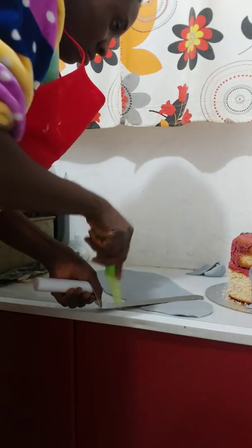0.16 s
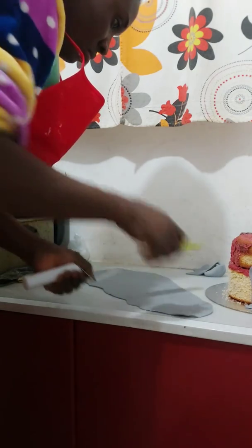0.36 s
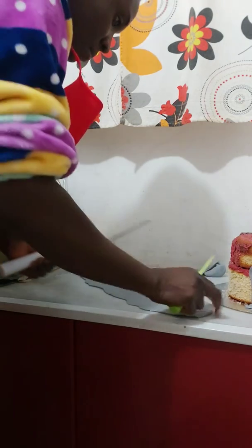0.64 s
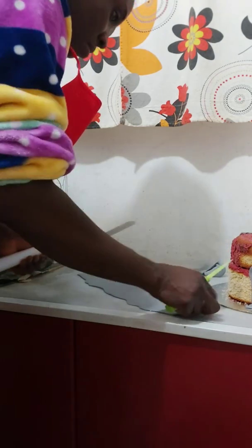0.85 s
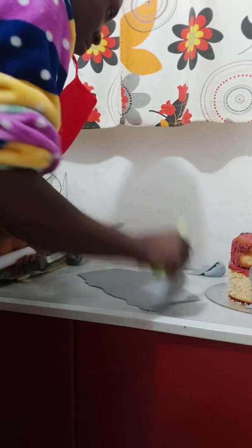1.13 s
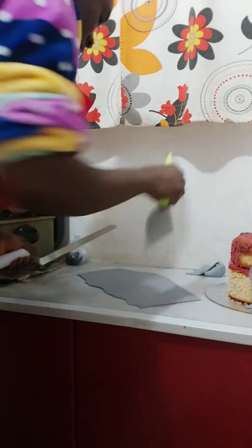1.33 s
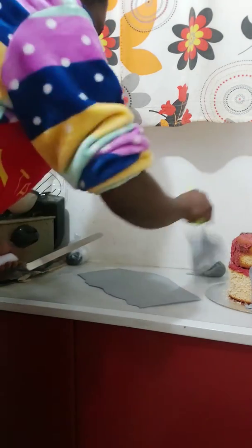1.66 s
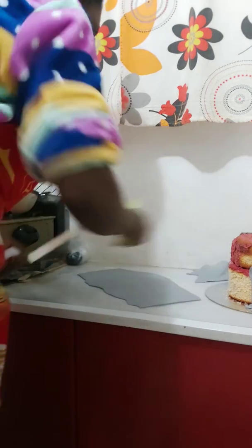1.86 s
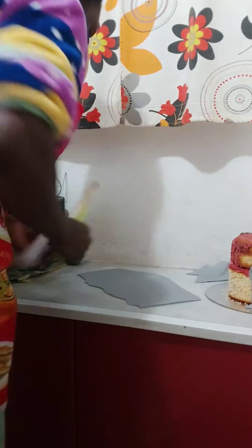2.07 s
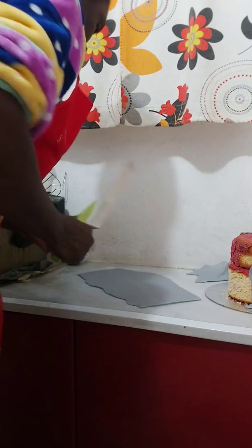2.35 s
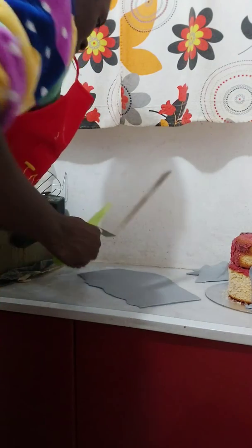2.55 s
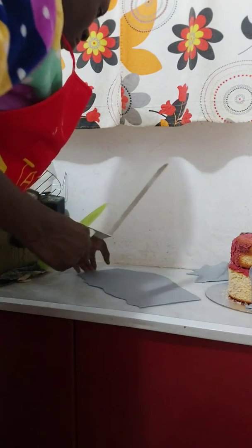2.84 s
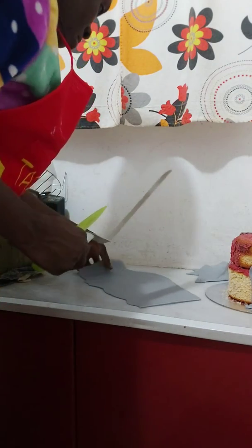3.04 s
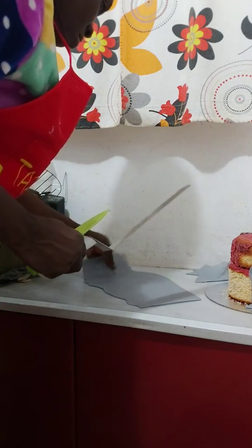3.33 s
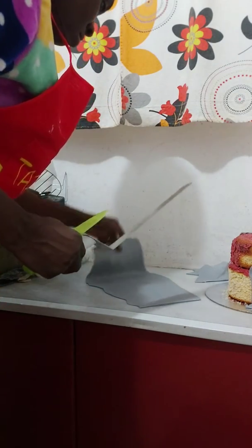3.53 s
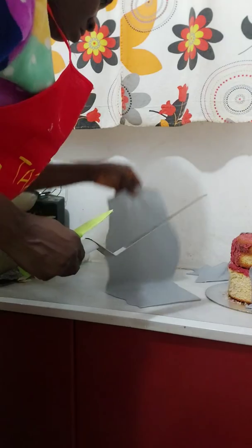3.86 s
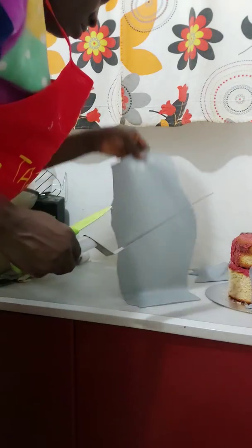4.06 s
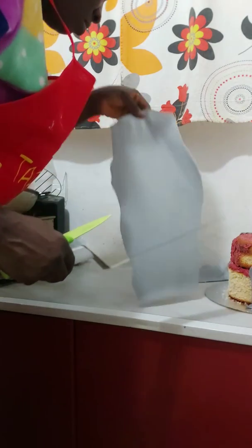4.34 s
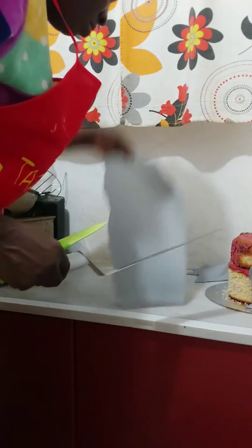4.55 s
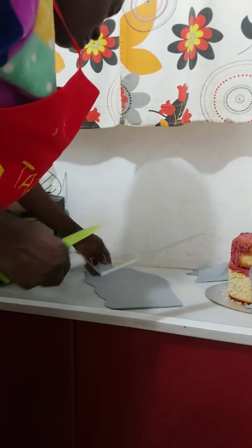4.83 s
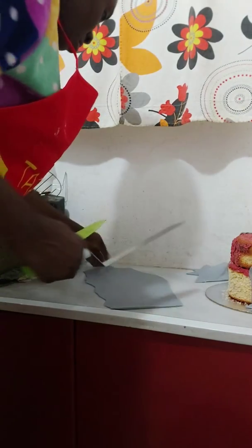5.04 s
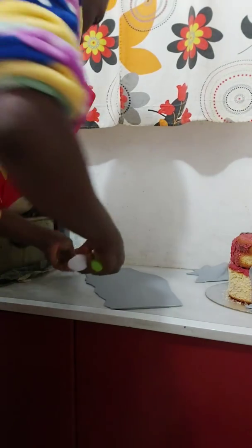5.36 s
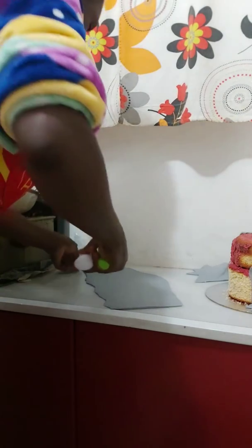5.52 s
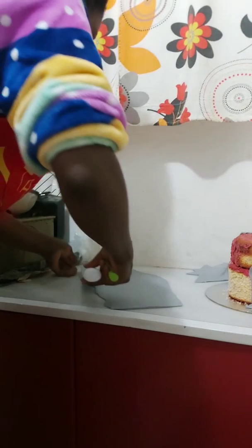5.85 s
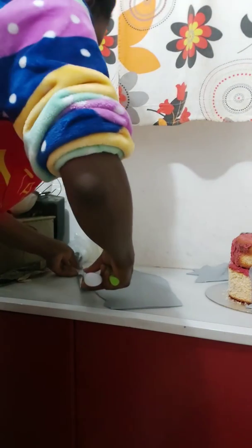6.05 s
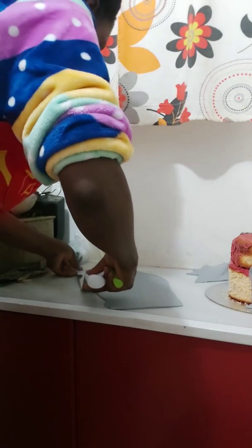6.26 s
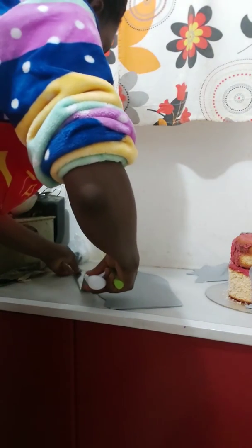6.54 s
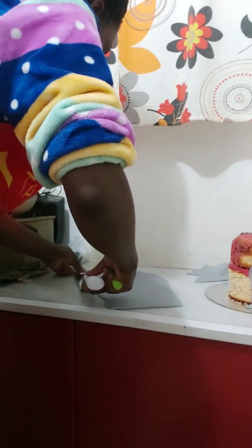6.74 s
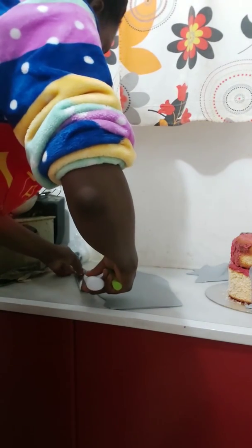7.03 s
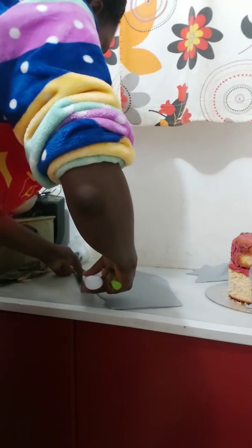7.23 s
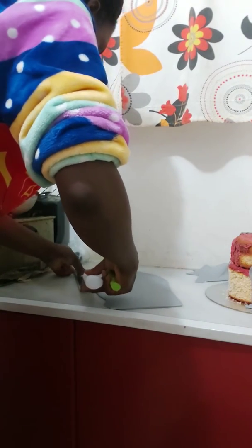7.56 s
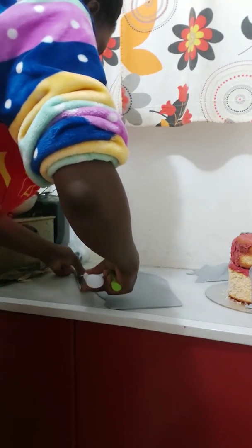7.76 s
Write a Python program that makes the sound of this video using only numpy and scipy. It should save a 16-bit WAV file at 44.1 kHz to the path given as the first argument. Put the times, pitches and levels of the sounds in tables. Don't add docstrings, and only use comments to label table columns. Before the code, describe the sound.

Over a wavering appliance hum, a short metallic scrape, a rattling tool tap, a faint sticky peel and a soft flat slap of icing.

```python
import sys
import numpy as np
from scipy import signal
from scipy.fft import rfft, irfft, next_fast_len
from scipy.io import wavfile
from scipy.ndimage import uniform_filter1d

SR = 44100
rng = np.random.default_rng(int(sys.argv[2]) if len(sys.argv) > 2 else 0)


def natural_amplitude(level_db):
    exponent = np.asarray(level_db, float) / 20
    return 10 ** exponent


def transcribe(signal):
    frames = np.atleast_2d(signal).T
    limited = np.clip(frames, -1, 1)
    pcm = np.round(limited * 32767).astype(np.int16)
    wavfile.write(sys.argv[1], SR, pcm)


N = 347949


def evened(x):
    return x / np.sqrt(np.mean(x ** 2) + 1e-20)


def read(points, hz):
    f, value = np.transpose(points)
    return np.interp(np.log(hz + 1), np.log(f + 1), value)


def coloured(x, tone):
    (low_hz, low_db), (high_hz, high_db) = tone[0], tone[-1]
    closed = [(low_hz / 2, low_db - 40)] + list(tone) + [(high_hz * 1.1, high_db - 40)]
    size = next_fast_len(x.shape[-1])
    gain = natural_amplitude(read(closed, np.fft.rfftfreq(size, 1 / SR)))
    return irfft(rfft(x, size) * gain, size)[..., :x.shape[-1]]


def add(mix, s, sound):
    part = mix[..., round(s * SR):][..., :sound.shape[-1]]
    part += sound[..., :part.shape[-1]]


def drift(t, step_s):
    knots = np.arange(0, N / SR + 1, step_s)
    return evened(np.interp(t, knots, rng.standard_normal(len(knots))))


def ring(x, hz, width):
    return signal.lfilter(*signal.iirpeak(hz, hz / width, SR), x)


def grit(count, per_s, spread_db):
    size = natural_amplitude(spread_db * np.minimum(rng.exponential(1, (2, count)), 4))
    sign = rng.choice([-1., 1.], (2, count))
    return size * sign * (rng.random((2, count)) < per_s / SR)


def rub(pressure, tone, per_s, spread_db, modes=(), modes_db=0):
    s, level_db = np.transpose(pressure)
    t = np.arange(s[0], s[-1], 1 / SR)
    slips = grit(len(t), per_s, spread_db)
    body = sum(natural_amplitude(db) * ring(slips, hz, width) for hz, width, db in modes)
    sound = evened(coloured(slips, tone)) + natural_amplitude(modes_db) * evened(body)
    return s[0], sound * natural_amplitude(np.interp(t, s, level_db))


# time in seconds, level in dB.
SCRAPE_START = [(0, -28), (.036, -31.5), (.045, -43)]
SCRAPE_MIDDLE = [(.039, -46.5), (.043, -24.5), (.049, -28.5), (.075, -26), (.09, -33.5), (.105, -42.5)]
SCRAPE_END = [(.09, -32), (.112, -26.5), (.118, -19.5), (.124, -25), (.135, -25), (.15, -48), (.175, -60)]
# frequency in Hz, level in dB per Hz.
SCRAPE_START_TONE = [(150, -32.5), (250, -11), (507, -3.5), (704, -12.5), (1120, -9.5), (1240, -14.5),
                     (2240, -4), (2480, -9.5), (4540, -8), (15400, -19.5)]
SCRAPE_MIDDLE_TONE = [(150, -27.5), (250, -9.5), (525, -9.5), (603, 0), (668, -16), (928, -5),
                      (1200, -14.5), (1580, -5), (2800, -8), (3100, -16), (3330, -6.5), (4160, -5.5),
                      (15400, -13)]
SCRAPE_END_TONE = [(150, -30.5), (250, -12.5), (525, -1.5), (680, -11.5), (944, -9), (1100, -6),
                   (1240, -18), (2020, -3.5), (3270, -8.5), (4310, -3), (9370, -7), (12600, -8),
                   (15400, -11.5)]
# frequency in Hz, width in Hz, level in dB.
BLADE_MODES = [(556, 18, -10), (800, 44, -1), (920, 52, -2.5), (1073, 48, -0.5), (1950, 79, -5),
               (2530, 240, -5.5), (4300, 330, -2), (5660, 120, -7.5), (7250, 160, -2), (11400, 140, 0)]


def scrape(mix):
    add(mix, *rub(SCRAPE_START, SCRAPE_START_TONE, 16000, 8.1))
    add(mix, *rub(SCRAPE_MIDDLE, SCRAPE_MIDDLE_TONE, 15000, 1.8, BLADE_MODES, -8.5))
    add(mix, *rub(SCRAPE_END, SCRAPE_END_TONE, 15000, 3.8, BLADE_MODES[:5], -18.0))


# start in seconds, peak in dB, frequency in Hz, t60 in seconds, left minus right in dB.
CATCH_EVENTS = [(.028, -30, 2240, .025, 2), (.0405, -27, 4040, .03, 0), (.0432, -25, 7300, .012, 0),
                (.054, -27, 4020, .04, 0), (.0705, -27, 550, .06, 1), (.0765, -27, 4460, .03, 0),
                (.089, -28, 2210, .03, 2), (.096, -28, 2370, .04, 4), (.111, -30, 1005, .035, -5),
                (.1165, -21, 5500, .02, 0), (0.1188, -25, 4430, .03, 0), (.124, -26, 2410, .03, 0),
                (.131, -26.5, 952, .04, 3), (.138, -27, 1000, .04, -2), (.147, -30, 4120, .04, 0),
                (1.7292, -43, 1300, .02, 0), (1.7325, -36, 2110, .03, 0), (1.769, -44, 2200, 0.028, 0),
                (1.803, -49, 2520, .04, -2), (1.7385, -35, 2004, .05, 0), (1.739, -40, 4070, .03, 0),
                (1.7443, -42, 6780, .03, 1), (1.7474, -34.5, 2680, .04, -1), (1.7505, -37, 2040, .04, 1),
                (1.758, -42, 2360, .04, 1), (1.762, -43, 3650, .03, 1), (3.463, -56, 2840, .06, 0),
                (3.472, -57, 2800, .06, 0), (4.592, -56, 1460, .025, 0), (4.609, -51, 940, .06, 0),
                (4.624, -48.5, 1170, .05, 0), (4.64, -51, 1040, .04, 0), (4.686, -47, 5150, .04, 0),
                (4.688, -47, 1120, .05, 0), (4.727, -47, 4630, .03, 0), (4.735, -44, 1950, .05, 0),
                (4.743, -46.5, 1060, .05, 0), (7.2615, -60, 2180, .022, 0), (7.274, -56, 866, .08, 0),
                (7.266, -60, 1400, .06, 0)]


def catch(db, hz, t60, pan_db):
    t = np.arange(3000) / SR
    decay = natural_amplitude([[db + pan_db / 2], [db - pan_db / 2]] - 60 * t / t60)
    rise_s = 0.0013
    return decay * np.minimum(t / rise_s, 1) * np.sin(2 * np.pi * hz * t)


# start in seconds, blow in dB.
TOOL_BLOWS = [(1.7295, -39), (1.7337, -32.5), (1.7379, -33.5), (1.7399, -34.5), (1.747, -37), (1.751, -36),
              (1.7597, -39.5)]
# frequency in Hz, level in dB, t60 in seconds.
TOOL_MODES = [(530, -16.5, 0.055), (837, -14.5, 0.038), (1070, -10.5, 0.041), (1300, -4, 0.066),
              (2040, -3, 0.02), (2370, -14, .03), (2665, -1, 0.015), (3050, -9, 0.03), (3630, -10, 0.023),
              (4015, -6.5, 0.018), (6830, -16, 0.022)]
# frequency in Hz, level in dB per Hz.
CRACK_TONE = [(300, -12), (1280, -6), (1700, -11.5), (2000, -4.5), (2700, -5.5), (3700, -9.5),
              (5300, -17.5), (7000, -13), (9000, -28), (12000, -25), (15400, -32)]


def tool_tap(db):
    t = np.arange(4000) / SR
    spot_db = 2.2 * rng.standard_normal((len(TOOL_MODES), 2, 1))
    modes = 0
    for (hz, mode_db, t60), uneven_db in zip(TOOL_MODES, spot_db):
        modes = modes + natural_amplitude(mode_db + uneven_db - 60 * t / t60) * np.sin(2 * np.pi * hz * t)
    crack_rise_s, crack_t60, tick_s = 0.0018, 0.038, .00016
    crack = evened(coloured(rng.standard_normal((2, len(t))), CRACK_TONE))
    crack = crack * natural_amplitude(-60 * t / crack_t60) * np.minimum(t / crack_rise_s, 1)
    tick = (t / tick_s) ** 2 * np.exp(-t / tick_s) * np.cos(2 * np.pi * 1500 * t)
    return natural_amplitude(db) * (0.62 * modes + 0.77 * crack + 1.2 * tick)


# time in seconds, level in dB.
PEEL_PULL = [(3.44, -73), (3.45, -58.5), (3.468, -55), (3.49, -54.5), (3.535, -67)]
LIFT_PULL = [(3.51, -65.5), (3.535, -57.5), (3.6, -65.5), (3.64, -74)]
# frequency in Hz, level in dB per Hz.
PEEL_COLOUR = [(1300, 2), (1700, -9.5), (2300, -10), (2850, -7), (3850, -11.5), (6800, -11), (8400, -23),
               (12000, -26), (15400, -18.5)]
LIFT_COLOUR = [(1000, -58), (1700, -28), (1750, -9), (1930, -4), (3690, -9), (4130, 1), (8560, -3.5),
               (15400, -3.5)]


def peel(mix):
    add(mix, *rub(PEEL_PULL, PEEL_COLOUR, 11000, 1.5))
    add(mix, *rub(LIFT_PULL, LIFT_COLOUR, 9000, 2.7))


# time in seconds, level in dB.
SLIDE_PRESSURE = [(4.59, -61.5), (4.594, -56), (4.615, -49), (4.63, -56.5), (4.65, -60.5), (4.675, -74)]
SLAP_PRESSURE = [(4.682, -62.5), (4.6855, -40.5), (4.7, -42.5), (4.72, -46), (4.74, -41), (4.76, -56.5),
                 (4.8, -57), (4.83, -67.5), (4.9, -72)]
# frequency in Hz, level in dB per Hz.
SLIDE_COLOUR = [(500, -14), (1000, 0), (1500, -8), (2600, -15), (3200, -20.5), (7500, -23), (8600, -34),
                (15400, -30)]
SLAP_COLOUR = [(300, 3), (600, -8.5), (1100, -3), (1560, -8.5), (2050, -4.5), (2600, -10), (4620, -8),
               (7500, -10), (9300, -16.5), (12000, -13.5), (15400, -15.5)]


def slap(mix):
    add(mix, *rub(SLIDE_PRESSURE, SLIDE_COLOUR, 9000, 3.3))
    add(mix, *rub(SLAP_PRESSURE, SLAP_COLOUR, 15000, 1.1))


# time in seconds, level in dB.
NUDGE_PRESSURE = [(7.259, -80.5), (7.264, -60.5), (7.28, -62.5), (7.31, -69), (7.34, -78.5)]
# frequency in Hz, level in dB per Hz.
NUDGE_COLOUR = [(700, -1.5), (900, 5.5), (1400, 1), (2150, -0.5), (2700, -10), (3200, -21), (4500, -28.5),
                (8000, -30)]


def nudge(mix):
    add(mix, *rub(NUDGE_PRESSURE, NUDGE_COLOUR, 5200, 4.6))


# strongest swing in seconds, peak in dB, frequency in Hz, length in cycles.
COUNTER_PUSHES = [(0.162, -34, 101.9, 5), (0.05, -42.5, 160, 12), (4.71, -48, 195, 8.5),
                  (0.6938, -30, 94.05, 8.2), (0.782, -35.5, 98.1, 11.3), (3.467, -39, 256, 10.2),
                  (4.692, -42.5, 258, 8.4), (3.472, -29.5, 107.5, 6.3), (3.505, -35, 100, 8.6),
                  (4.651, -41.5, 93, 7.1), (4.705, -37, 105, 3.2)]


def thump(crest_s, db, hz, cycles):
    half = int(cycles * SR / hz / 2)
    t = np.arange(-half, half) / SR
    swing = np.cos(2 * np.pi * hz * t) * np.hanning(len(t))
    return crest_s + t[0], natural_amplitude(db) * swing * np.ones((2, 1))


# start in seconds,
# hold in seconds, level in dB, brightness in dB.
BRUSHES = [(0.255, .15, -72.5, -4.5), (0.421, .06, -67.5, -1), (0.559, 0.22, -78, -3.5),
           (0.772, 0.088, -73.5, -8.5), (.9, .04, -70, -2.5), (1.013, 0.093, -76, -6.5),
           (1.096, .1, -70, 2), (1.295, 0.19, -84, -4), (1.582, 0.12, -73.5, -10),
           (1.735, 0.051, -61, -6.5), (1.889, 0.15, -76.5, -12), (2.031, .08, -69, -5),
           (2.158, 0.11, -72, -3.5), (2.271, 0.066, -72.5, -4), (2.41, 0.24, -81.5, -2.5),
           (2.68, .04, -75, 1.5), (2.971, 0.026, -75.5, -5), (3.109, .09, -73.5, 2),
           (3.26, 0.054, -73, -3.5),
           (3.458, .1, -74.5, 6), (3.6, 0.14, -69.5, 6), (3.728, .17, -72, 7.5),
                  (3.898, .2, -75, 6.5), (4.101, .2, -76.5, 6.5), (4.299, 0.046, -72.5, 2),
                  (4.84, 0.11, -74, -2.5), (4.993, .08, -81, -6.5), (5.424, .03, -84.5, -8.5),
                  (5.756, .03, -85, -7), (6.119, .03, -77, -9.5), (6.28, .03, -83.5, -0.5),
                  (6.392, 0.043, -70, 4), (6.569, 0.028, -85.5, -4), (6.868, .03, -84.5, 0),
                  (7.17, 0.033, -74.5, -3.5), (7.247, .05, -81, -3), (7.46, .02, -82, 2.5),
                  (7.701, .04, -88.5, -3)]
# frequency in Hz, level in dB per Hz.
CLOTH_TONE = [(1800, -10), (3200, -12.5), (4200, -3), (4900, -8.5), (5600, -13.5)]
SKIN_TONE = [(4600, -19), (5600, -5.5), (7000, -3), (7900, -11.5), (9000, -18)]
FINE_TONE = [(8500, -17.5), (10500, -7.5), (12000, -2.5), (14000, -1.5), (15000, 0.5), (15600, -3)]
FOLDS_TONE = [(200, -4), (400, -0.5), (800, -5.5), (1500, -10), (2000, -15)]


def rustle():
    rise_s, swell_share, sag_db, fade_db_per_s = 0.032, .35, 2, 150
    t, power = np.arange(N) / SR, np.zeros((4, N))
    for s, hold_s, db, bright_db in BRUSHES:
        cloth_db = db - 3 - 0.42 * bright_db - 3.5 * (s > 5)
        folds_db = cloth_db + 6.5
        rise = np.clip((t - s + rise_s) / (rise_s + swell_share * hold_s), 0, 1)
        sag = sag_db * np.clip((t - s) / hold_s, 0, 1) ** 2
        fade = fade_db_per_s * np.maximum(t - s - hold_s, 0)
        shape = rise * natural_amplitude(-sag - fade)
        power += np.outer(natural_amplitude([cloth_db, db, db + bright_db, folds_db]), shape) ** 2
    tones = (CLOTH_TONE, SKIN_TONE, FINE_TONE, FOLDS_TONE)
    return sum(evened(coloured(grit(N, 14000, 3.9), tone)) * np.sqrt(p) for tone, p in zip(tones, power))


# time in seconds, level in dB.
HUM_SWELL = [(0.25, -32), (0.82, -32.5), (1.11, -27.5), (1.64, -34), (2.23, -31.5), (2.86, -34.5),
             (3.47, -32), (3.93, -38), (4.12, -32), (4.58, -39), (5.15, -33), (5.36, -40.5), (6.16, -35),
             (6.31, -40), (6.75, -29.5), (7.23, -39), (7.57, -32), (7.8, -36)]
# multiple of mains, rms level in dB, left minus right in dB.
HUM_PARTIALS = [(3, -52, 0), (5, -65, 4.5), (6, -63.5, -11.5), (7, -62, -1.5), (8, -70, 1.5),
                (10, -74.5, 0.5), (11, -80, 0.5), (12, -82.5, -1.5)]


def hum():
    mains_hz = 50.017
    t = np.arange(N) / SR
    turn = 2 * np.pi * mains_hz * t
    hum_db = np.interp(t, *np.transpose(HUM_SWELL))
    out = natural_amplitude(hum_db) * np.cos(2 * turn + 2.15) * np.ones((2, 1))
    whine = natural_amplitude(-78.5 + 6 * np.tanh(drift(t, step_s=.15)))
    out += whine * np.cos(16 * turn + np.cumsum(rng.standard_normal(N)) / 60)
    knots = np.arange(0, N / SR + 1, .2)
    follow_db = 0.28 * (hum_db - hum_db.mean())
    for order, db, pan_db in HUM_PARTIALS:
        waver_db = 0.31 * order * np.interp(t, knots, rng.standard_normal(len(knots)))
        phase = 2 * np.pi * rng.random() + 0.16 * waver_db
        tone = natural_amplitude(db + waver_db + follow_db) * np.cos(round(order) * turn + phase)
        out += tone * natural_amplitude([[pan_db / 2], [-pan_db / 2]])
    return np.sqrt(2) * out


# frequency in Hz, level in dB per Hz.
AIR_TONE = [(28, -20), (60, -12), (100, 5.5), (200, -7), (330, -12.5), (400, -11), (500, -25), (1100, -20),
            (1500, -22), (1750, -33.5), (3500, -42), (7300, -43.5), (8200, -52.5), (12500, -44),
            (15600, -48.5)]
# frequency in Hz, width in Hz, lift in dB.
WHIRR_PEAKS = [(168, 8, 5), (220, 18, 6), (281, 8, 6), (423, 25, 4.5), (525.2, 26, 14.5), (671, 72, 7.5),
               (976, 38, 6), (1100, 52, 6.5), (1215, 26, 11), (1403, 22, 8.5), (1690, 30, 2)]
# frequency in Hz, left-right likeness from -1 to 1.
LIKENESS = [(30, 1), (55, -0.048), (99, 1), (160, 0.52), (270, 0.99), (450, .73), (740, 0.36),
            (1220, -0.34), (2010, 0.064), (15000, 0.096)]


def air():
    frames, hz = N // 512 + 5, np.fft.rfftfreq(2048, 1 / SR)
    a, b, c, d, patches = rng.standard_normal((frames, 1025, 5)).T
    patches = evened(uniform_filter1d(uniform_filter1d(patches, 8, 0), 8, 1))
    same = np.clip(read(LIKENESS, hz), -1, 1)[:, None]
    left = a + 1j * b
    z = np.array([left, same * left + np.sqrt(1 - same ** 2) * (c + 1j * d)])
    peaks_db = sum(db / (1 + (2 * (hz - f) / width) ** 2) for f, width, db in WHIRR_PEAKS)
    shape_db = read(AIR_TONE, hz) + peaks_db
    t = np.arange(frames) * 512 / SR
    hum_db = np.interp(t, *np.transpose(HUM_SWELL))
    hum_db = hum_db - hum_db.mean()
    rumble_db = 0.56 * hum_db + 1.3 * drift(t, step_s=.2)
    whirr_db = 0.091 * hum_db + drift(t, step_s=.2) - 0.06 * (t - t.mean())
    swell_db = np.outer(hz < 480, rumble_db) + np.outer((hz >= 480) & (hz < 1900), whirr_db)
    patch_db = np.where(hz < 1900, 2.1, 1.1)[:, None] * patches
    z *= natural_amplitude(shape_db[:, None] + patch_db + swell_db)
    return natural_amplitude(-50) * evened(signal.istft(z, nperseg=2048, noverlap=1536)[1][:, :N])


# frequency in Hz, t60 in seconds.
KITCHEN_T60 = [(300, .28), (1000, .21), (3000, .2), (8000, .18), (15000, .17)]


def kitchen(x):
    taps = np.zeros((2, SR // 2))
    at = np.arange(120, SR // 2 - 20, 20)
    at = at + rng.integers(0, 20, (2, len(at)))
    np.put_along_axis(taps, at, rng.choice([-1., 1.], at.shape), 1)
    hz, t, z = signal.stft(taps, SR, nperseg=256)
    decay = natural_amplitude(-60 * t / read(KITCHEN_T60, hz)[:, None])
    tail = signal.istft(z * decay, SR, nperseg=256)[1]
    return signal.fftconvolve(x, tail / np.linalg.norm(tail[0]), axes=1)[:, :N]


def close_ports(x):
    size = next_fast_len(N + 4096)
    same = np.clip(read(LIKENESS, np.fft.rfftfreq(size, 1 / SR)), -.9, 1)
    mid = rfft(x[0] + x[1], size) * np.sqrt(1 + same)
    side = rfft(x[0] - x[1], size) * np.sqrt(1 - same)
    return irfft([mid + side, mid - side], size)[:, :N] / 2


def scene():
    near, caught, soft = np.zeros((3, 2, N))
    scrape(near)
    peel(near)
    slap(near)
    nudge(near)
    for s, db in TOOL_BLOWS:
        add(near, s, tool_tap(db))
    for s, *how in CATCH_EVENTS:
        add(caught, s, catch(*how))
    for push in COUNTER_PUSHES:
        add(soft, *thump(*push))
    tail = kitchen(near + natural_amplitude(-9) * caught)
    contacts = close_ports(natural_amplitude(-4) * near + caught + natural_amplitude(-1.5) * tail)
    return contacts + soft + rustle() + hum() + air()


def low_pass(x):
    return signal.sosfilt(signal.butter(12, 15540, fs=SR, output="sos"), x)


# frequency in Hz, left minus right in dB.
PORT_COLOUR = [(60, 3), (110, 1), (200, -3.5), (380, -1.5), (700, -4), (1290, -1.5), (2380, -3),
               (4400, -0.5), (8120, -5), (15000, -13)]


def record(dry):
    size = next_fast_len(N + 8192)
    half_db = read(PORT_COLOUR, np.fft.rfftfreq(size, 1 / SR)) / 2
    running_on = np.pad(dry, ((0, 0), (0, size - N)), "reflect", reflect_type="odd")
    ports = irfft(rfft(running_on) * natural_amplitude([half_db, -half_db]), size)[:, :N]
    return low_pass(ports)


dry = scene()
out = record(dry)
transcribe(out)
```